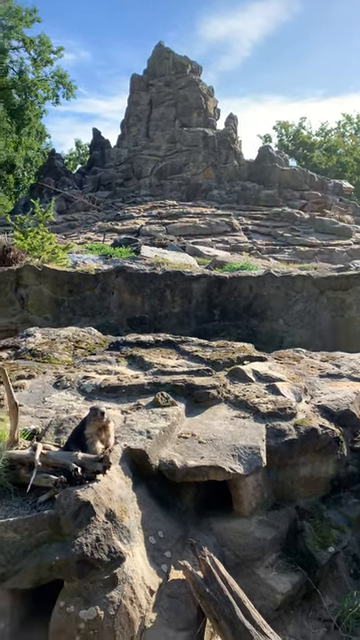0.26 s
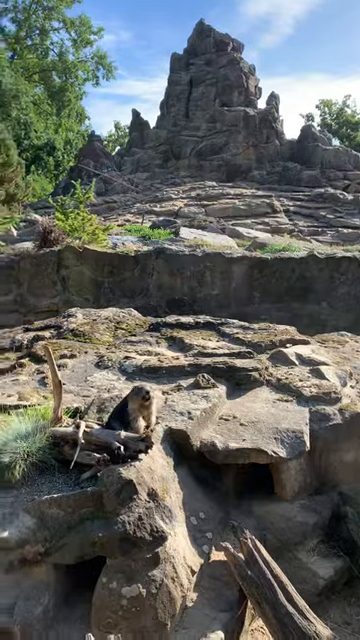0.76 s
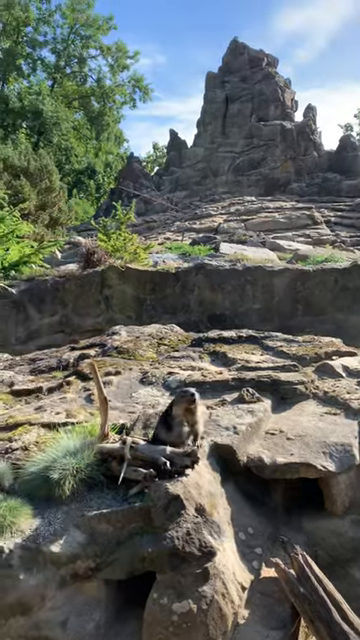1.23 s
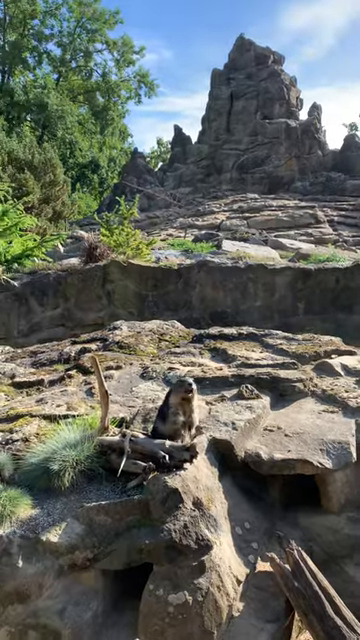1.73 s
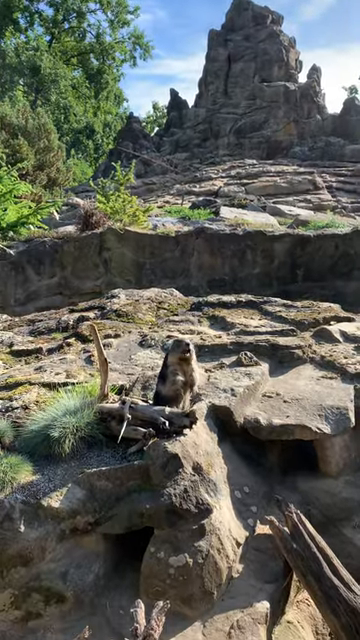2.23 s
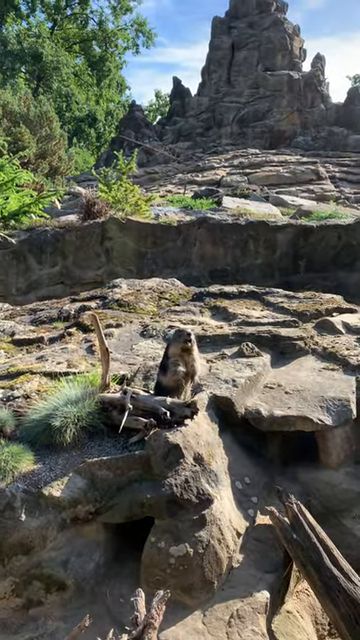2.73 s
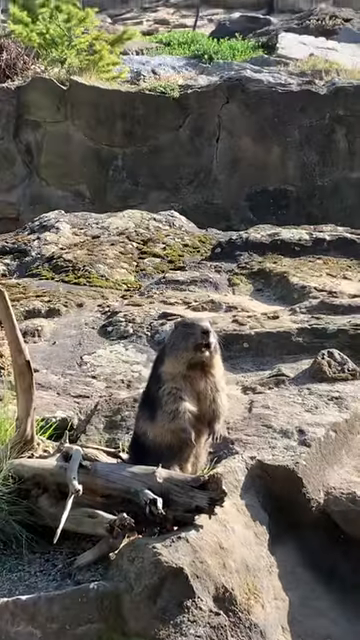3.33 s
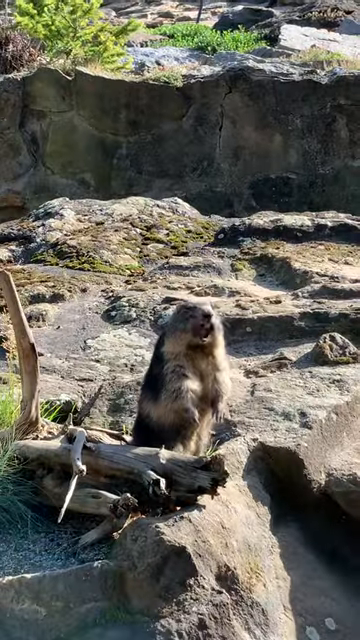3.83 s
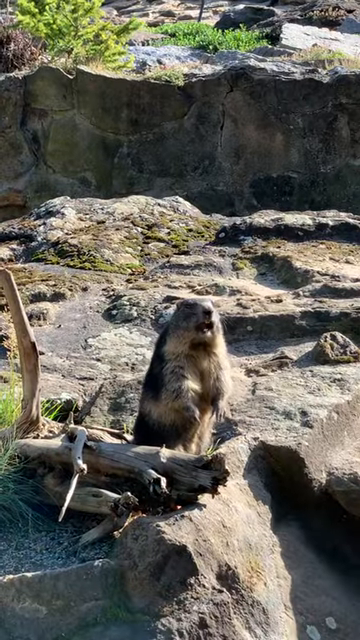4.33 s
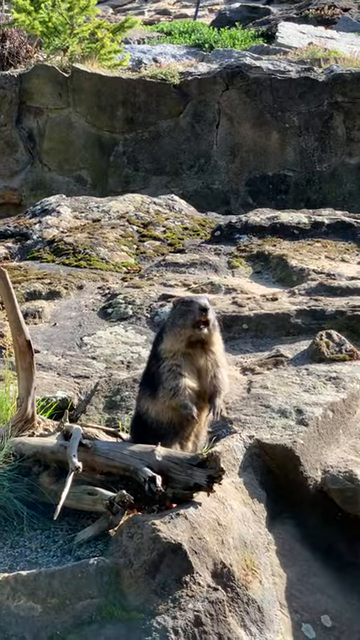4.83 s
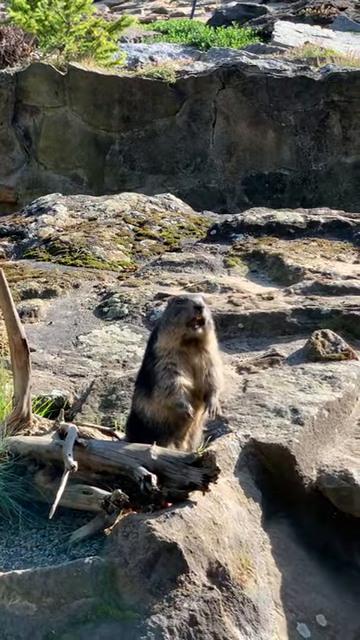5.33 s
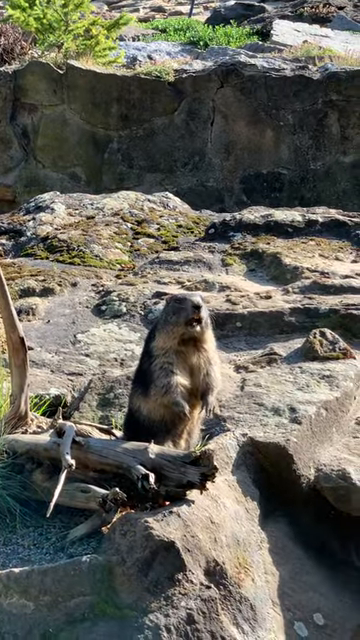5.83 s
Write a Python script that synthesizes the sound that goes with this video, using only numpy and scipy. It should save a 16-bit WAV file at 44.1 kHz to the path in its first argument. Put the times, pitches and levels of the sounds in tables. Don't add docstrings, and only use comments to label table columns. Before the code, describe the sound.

Heard on a phone in a walled stone enclosure: eight abrupt, piercing alarm cries from a marmot, each around a tenth of a second, bright, reedy and arching in pitch. The first is strongest and longest; later ones are slightly lower and more restrained. Close rock reflections and a short faint tail follow each. Between them lie a soft low rumble, light hiss and tiny distant bird chirps, dipping when the phone's automatic gain clamps.

```python
import sys
import numpy as np
from scipy import signal
from scipy.fft import rfft, irfft, next_fast_len
from scipy.io import wavfile
from scipy.ndimage import uniform_filter1d

SR = 44100
rng = np.random.default_rng(int(sys.argv[2]) if len(sys.argv) > 2 else 0)


def volts_from_db(level):
    exponent = np.asarray(level, float) / 20
    return 10 ** exponent


def pcm_store(signal):
    levels = np.round(np.clip(np.atleast_2d(signal), -1, 1) * 32767)
    wavfile.write(sys.argv[1], SR, levels.astype(np.int16).T)


N = 267246

# freq_hz, density_db
AMBIENCE_SPECTRUM = [(15, -37), (30, -17.5), (40, 0.5), (90, 1.5), (200, -12), (474, -20.5), (1250, -23),
                     (1900, -23), (2300, -25.5), (3900, -30.5), (5200, -35), (8300, -36), (12700, -44.5),
                     (15800, -56.5)]
AMBIENCE_DB = -42.5
# freq_hz, correlation
AMBIENCE_CORRELATION = [(60, .999), (150, 0.95), (300, 0.74), (700, 0.062), (1500, 0.94), (2300, 0.13),
                        (3100, 0.067), (4000, 0.14), (5000, 0.96), (7000, 1), (14000, 1)]

# start_s, length_s, middle_hz, level_db
CHIRPS = [(0.084, 0.088, 4200, -52), (0.175, 0.023, 3550, -50.5), (0.45, 0.035, 6470, -52.5),
          (0.52, 0.065, 3430, -47.5), (3.169, 0.064, 4500, -47.5), (3.24, 0.067, 4000, -49.5),
          (3.618, .04, 4300, -52), (4.68, .084, 4240, -48), (4.76, 0.049, 4560, -48.5),
          (5.677, 0.049, 5000, -47), (5.74, .062, 4380, -50)]
# start_s, length_s, middle_hz, level_db
SWEEPS = [(0.085, 0.028, 6110, -51), (1.689, 0.036, 5230, -45), (2.074, .043, 4830, -53),
          (2.399, .12, 4100, -52.5), (2.711, 0.033, 3680, -50), (3.229, .06, 1120, -52)]
# start_s, length_s, middle_hz, level_db
NOTES = [(.463, 0.069, 3920, -53.5), (2.142, .035, 3570, -49), (2.16, .052, 3824, -59),
         (2.74, 0.029, 2725, -44), (3.09, .11, 1095, -51), (3.639, 0.095, 3330, -46),
         (3.941, .12, 718, -55.5), (5.014, 0.063, 923, -55), (5.351, 0.072, 541, -51.5),
         (5.351, 0.12, 400, -52), (5.508, 0.16, 374, -55), (5.588, .074, 890, -56),
         (6.052, .032, 4036, -39)]
BENDS = [
    (.84, .81),
    (1.16, .82),
    (.99, .98),
]

# top_s, top_hz, level_db, rise_s (half pitch to top), fall_s (top to half pitch)
CALLS = [
    (0.8196, 2217, 7, .0605, 0.11),
    (1.234, 2160, 3.5, .042, .064),
    (1.782, 2148, 2, .04, .069),
    (2.295, 2110, -0.3, .041, .073),
    (2.9096, 2095, -0.3, .038, .0784),
    (3.8311, 2079, 2, 0.042, .068),
    (4.563, 2074, -0.05, 0.042, 0.062),
    (5.2382, 2064, -1, .039, 0.064),
]
OVERTONES_DB = [1, -6.5, -11, -10, -21.5, -39.5, -34.5, -31]
# freq_hz, gain_db
MOUTH = [(500, -35.5), (1100, -6), (1900, -1.5), (2700, 10.5), (3300, 3), (4200, -0.5), (5200, -2),
         (6500, -13.5), (10000, -17.5), (16000, 3.5)]
# time_rises, level_db
ATTACK = [
    (-1.384, -33.5),
    (-0.7, -10.5),
    (-0.064, 1.4),
]
# time_falls, level_db
RELEASE = [
    (.27, -4),
    (.46, -12.5),
    (0.929, -33),
]
RISE_BEND, FALL_BEND = 2.15, 1.75
USUAL_RISE_S, USUAL_FALL_S = 0.04, 0.07
FLATTER, EFFORT_STRETCH = 0.35, 0.75

# delay_s, left_db, right_db
ROCKS = [(.0031, -12, -23), (.0074, -10.5, -7.5), (.0125, -16.5, -9.5), (0.02, -18.5, -31.5),
         (.028, -16.5, -24.5)]
# delay_s, spread_s, level_db
WALLS = [(0.109, .012, -59), (0.203, 0.0085, -51.5), (.37, .015, -65.5)]

OPEN_DB = 0.5
# start_s, attack_s, gain_db, hold_s, recovery_db_per_s
CLAMPS = [
    (.781, .021, -22.5, 0.14, 96.5),
    (.762, 0.024, -3.5, 3.5, 0.1),
    (1.205, 0.023, -17, 0.022, 16),
    (1.221, 0.029, -16, 1.28, 2),
]
# freq_hz, left_lag_rad
PORTS = [(0, 0), (900, .85), (1700, .1), (2100, -.1), (2400, 2.3), (3100, 3.1), (3900, 5.4), (4200, 5),
         (4500, 3.3), (5200, 2.9), (6300, .7), (7000, 0), (9600, -3.14), (12300, -6.28), (14800, -9.42),
         (16000, -10.5)]


def rms_one(x):
    return x / np.sqrt(np.mean(x ** 2) + 1e-20)


def at_hz(points, hz):
    freq_hz, value = np.array(points).T
    return np.interp(np.log(hz), np.log(freq_hz), value)


def drift(rate_hz):
    r = np.exp(-16 * np.pi * rate_hz / SR)
    white = rng.standard_normal(N // 8 + 4002)
    slow = signal.lfilter([1], [1, -2 * r, r * r], white)[4000:]
    return np.interp(np.arange(N) / 8, np.arange(len(slow)), rms_one(slow))


def later(x, samples):
    return np.interp(np.arange(N) - samples, np.arange(N), x, left=0)


def filtered(x, order, hz, kind="band"):
    return signal.sosfilt(signal.butter(order, hz, kind, fs=SR, output="sos"), x)


def ambience(patchy_db):
    out, together = 0, drift(3.4)
    edges_hz = 22 * 2 ** np.arange(0, 9.7, 1 / 3)
    white = rng.standard_normal((2, 2, N))
    for k, (low_hz, high_hz) in enumerate(zip(edges_hz, edges_hz[1:])):
        mid, side = filtered(white[k % 2], 2, [low_hz, high_hz])
        hz = np.sqrt(low_hz * high_hz)
        alike = np.clip(at_hz(AMBIENCE_CORRELATION, hz), -1, 1)
        flicker_db = patchy_db * (1.2 * together + drift(13))
        gain = volts_from_db(at_hz(AMBIENCE_SPECTRUM, hz) + flicker_db)
        out = out + gain * (np.sqrt(1 + alike) * mid + np.sqrt(1 - alike) * side * [[1], [-1]])
    return volts_from_db(AMBIENCE_DB) * rms_one(out)


def birds():
    out, rough, flutter = np.zeros(N), drift(300), drift(100)
    for rows, (start, end) in zip((CHIRPS, SWEEPS, NOTES), BENDS):
        for start_s, length_s, middle_hz, level_db in rows:
            span = np.arange(round(start_s * SR), min(round((start_s + length_s) * SR), N))
            u = (span / SR - start_s) / length_s
            hz = np.polyval(np.polyfit([0, 0.5, 1], [start, 1, end], 2), u) * middle_hz
            hz *= 1 + (0.012 + 0.41 * abs(1 - end)) * middle_hz / 4500 * rough[span]
            envelope = volts_from_db(level_db + 3.6 * flutter[span]) * np.sqrt(abs(np.sin(np.pi * u)))
            out[span] += envelope * np.sin(2 * np.pi * np.cumsum(hz) / SR)
    return np.array([out + 0.5 * later(out, 610), out + 0.5 * later(out, 840)])


def marmot(jitter, shimmer_db, breath_db, puff_db):
    out = np.zeros(N)
    wobble, shimmer = drift(260), [drift(130) for k in range(3)]
    white = rng.standard_normal((2, N))
    breath = rms_one(signal.lfilter([1], [1, -0.6], filtered(white[0], 2, 1500, "high")))
    puff = rms_one(filtered(white[1], 2, [150, 600]))
    for top_s, top_hz, call_db, rise_s, fall_s in CALLS:
        attack_s = USUAL_RISE_S * (rise_s / USUAL_RISE_S) ** EFFORT_STRETCH
        release_s = USUAL_FALL_S * (fall_s / USUAL_FALL_S) ** EFFORT_STRETCH
        effort = [(top_s + x * attack_s, db) for x, db in ATTACK]
        effort += [(top_s + x * release_s, db) for x, db in RELEASE]
        effort_s, effort_db = np.transpose(effort)
        span = np.arange(round(effort_s[0] * SR), round(effort_s[-1] * SR))
        u = span / SR - top_s
        rising = u < 0

        rise_bend = RISE_BEND * (rise_s / USUAL_RISE_S) ** FLATTER
        sag = 0.5 * np.where(rising, (abs(u) / rise_s) ** rise_bend, (abs(u) / fall_s) ** FALL_BEND)
        sag = uniform_filter1d(sag, size=500, mode="nearest")
        slack = np.where(rising, sag, 0.07 * sag)
        hz = top_hz * (1 - sag) * (1 + (0.00071 + jitter * slack) * wobble[span])
        hz = np.maximum(hz, 300)
        phase = 2 * np.pi * np.cumsum(hz) / SR

        duller_db = np.where(rising, 9, 12) * sag
        sizes = [volts_from_db(db - max(k - 2, 0) * duller_db + at_hz(MOUTH, (k + 1) * hz))
                 for k, db in enumerate(OVERTONES_DB)]
        uneven = []
        for k, v in enumerate(shimmer):
            depth_db = shimmer_db * np.minimum(0.016 + 0.1 * k + 3 * slack, 1)
            uneven.append(volts_from_db(depth_db * (np.tanh(v[span]) + 0.5578)))
        tone = sum(a * uneven[min(k, 2)] * np.sin((k + 1) * phase) for k, a in enumerate(sizes))
        tone /= np.sqrt(np.sum(np.square(sizes), axis=0) / 2)

        air = volts_from_db(breath_db + 40 * slack) * breath[span]
        air += volts_from_db(puff_db + 52 * slack) * puff[span] * rising
        level_db = uniform_filter1d(np.interp(span / SR, effort_s, effort_db), size=130) + call_db
        locked = 1 / (1 + np.exp((sag - np.where(rising, 0.13, 0.08)) / 0.011))
        level_db += 2.2 * (locked - 0.9)
        out[span] = volts_from_db(level_db) * (tone + air) * signal.windows.tukey(len(span), 0.14)
    return out


def enclosure(x):
    out = np.array([x, x])
    for delay_s, *side_db in ROCKS:
        bounce = np.array([later(x, delay_s * SR + 2.8), later(x, delay_s * SR)])
        out += volts_from_db(side_db)[:, None] * bounce
    t = np.arange(SR) / SR
    power = volts_from_db(2 * (-39.5 - 60 * t / 0.17)) + volts_from_db(2 * (-62 - 60 * t / 1.0))
    for delay_s, spread_s, level_db in WALLS:
        power += volts_from_db(2 * level_db - 34.5) * np.exp(-((t - delay_s) / spread_s) ** 2)
    scatter = rng.standard_normal((2, SR)) * np.sqrt(power) * np.clip(t / 0.0051, 0, 1)
    scatter = filtered(scatter, 1, [2200, 6000])
    return out + signal.fftconvolve(scatter, x[None], axes=1)[:, :N]


def gain_db():
    t, out = np.arange(N) / SR, OPEN_DB
    for start_s, attack_s, clamp_db, hold_s, recovery_db_per_s in CLAMPS:
        closing = OPEN_DB + (clamp_db - OPEN_DB) * np.clip((t - start_s) / attack_s, 0, 1)
        opening = clamp_db + recovery_db_per_s * (t - start_s - attack_s - hold_s)
        out = np.minimum(out, np.maximum(closing, opening))
    return out


def scene():
    background = ambience(patchy_db=1.5) + birds()
    call = volts_from_db(-1.5) * marmot(jitter=0.13, shimmer_db=8, breath_db=-34, puff_db=-49.5)
    return background + enclosure(call)


def low_pass(x):
    return signal.sosfilt(signal.butter(12, 15960, fs=SR, output="sos"), x)


def record(dry):
    size = next_fast_len(N + 2000)
    lag_rad = np.interp(np.arange(size // 2 + 1) * SR / size, *np.transpose(PORTS))
    ports = irfft(rfft(dry, size) * np.exp(0.5j * lag_rad * [[-1], [1]]), size)[:, :N]
    ports *= volts_from_db(gain_db())
    over = np.maximum(abs(ports) - 0.7, 0)
    limited = ports - np.sign(ports) * (over - 0.22 * np.tanh(over / 0.22))
    return low_pass(limited)


dry = scene()
out = record(dry)
pcm_store(out)
```